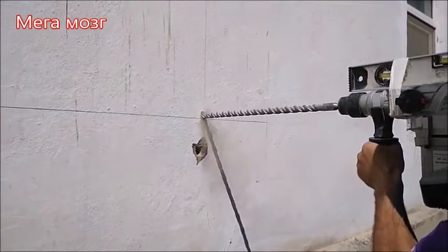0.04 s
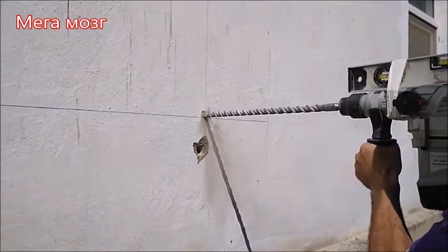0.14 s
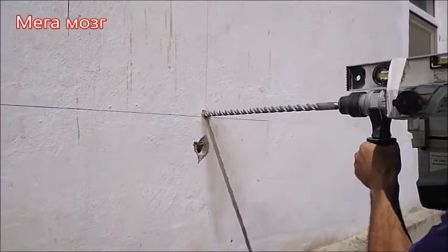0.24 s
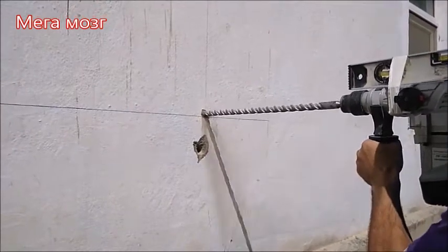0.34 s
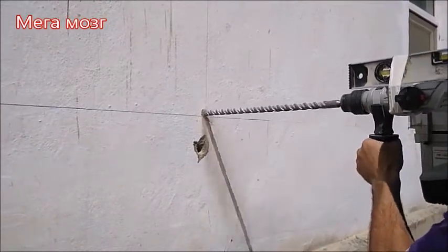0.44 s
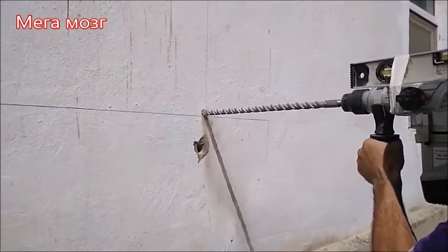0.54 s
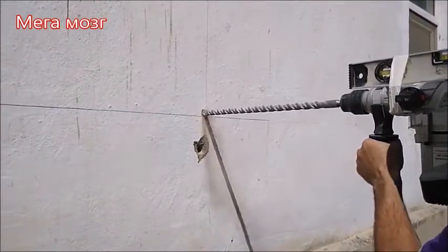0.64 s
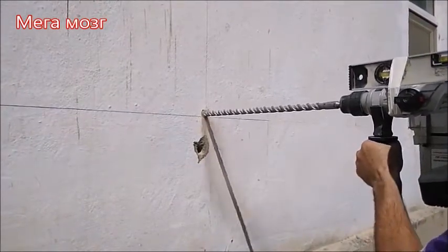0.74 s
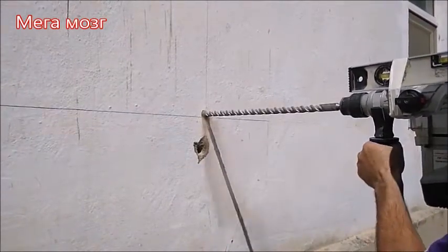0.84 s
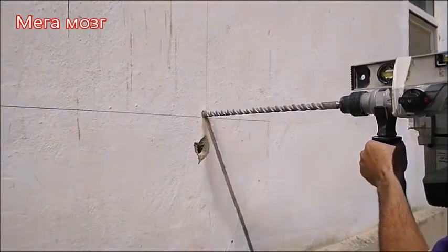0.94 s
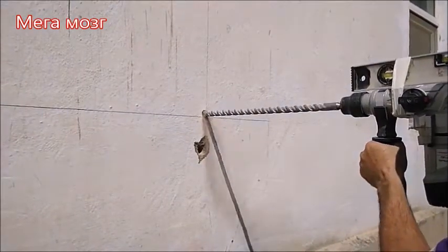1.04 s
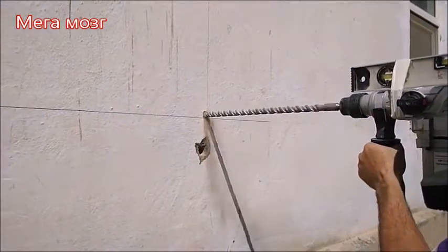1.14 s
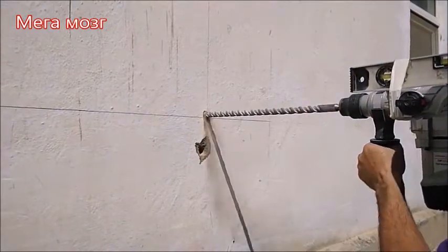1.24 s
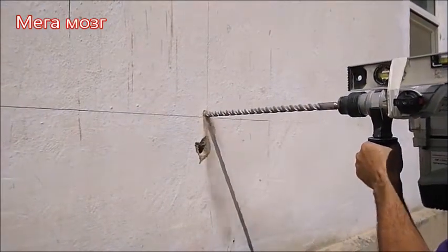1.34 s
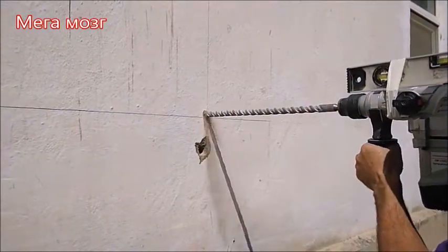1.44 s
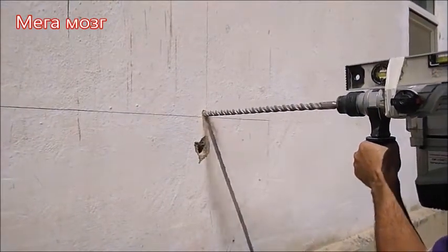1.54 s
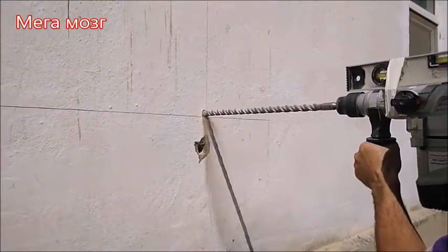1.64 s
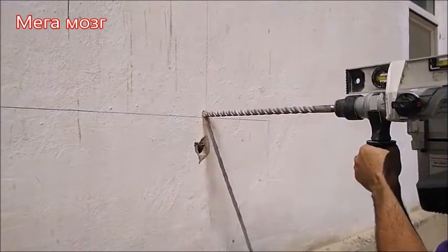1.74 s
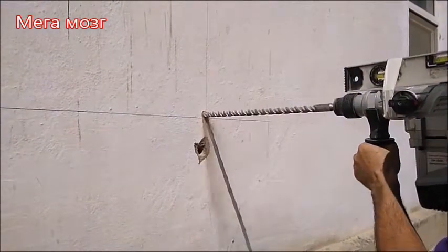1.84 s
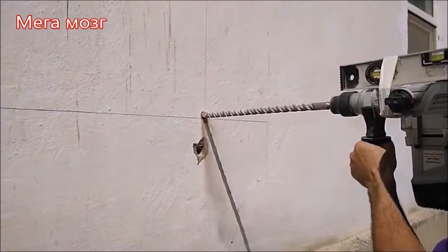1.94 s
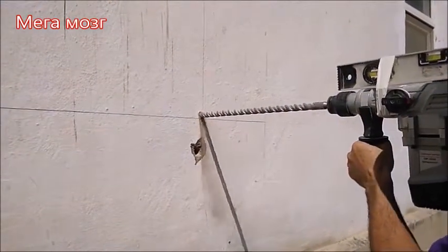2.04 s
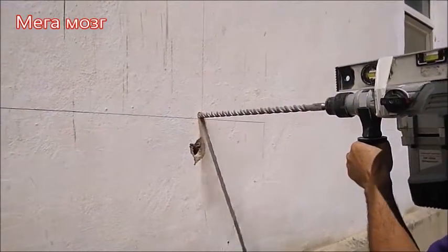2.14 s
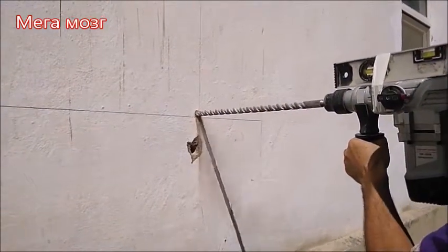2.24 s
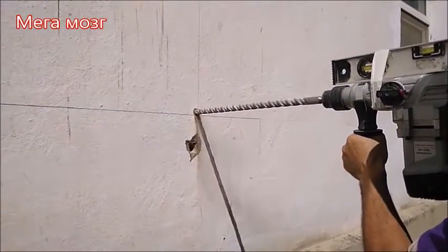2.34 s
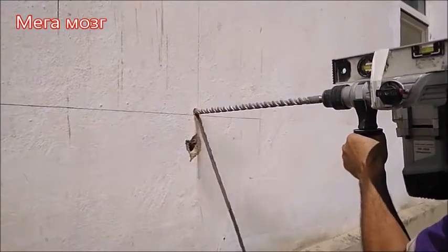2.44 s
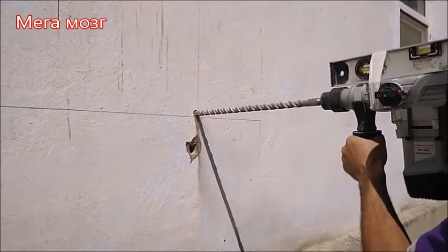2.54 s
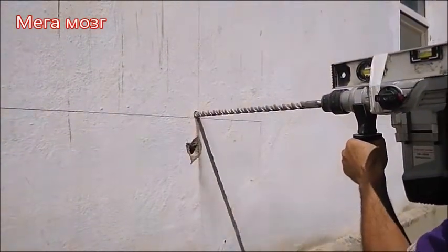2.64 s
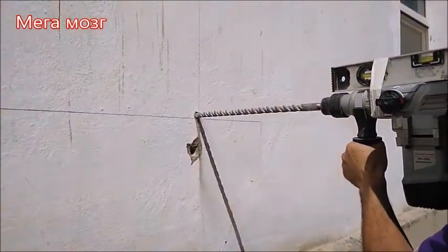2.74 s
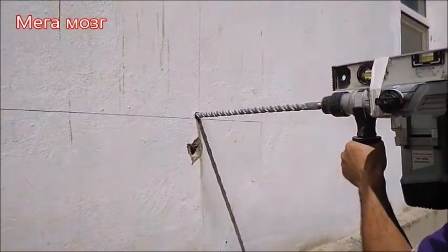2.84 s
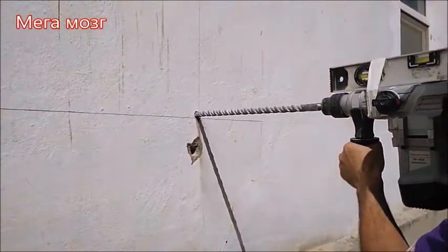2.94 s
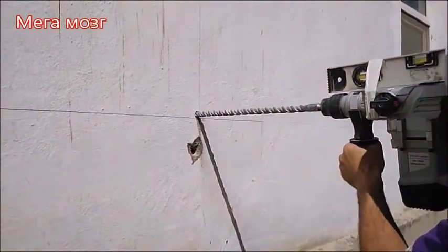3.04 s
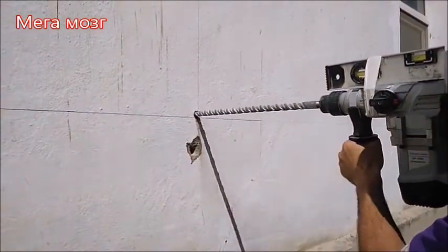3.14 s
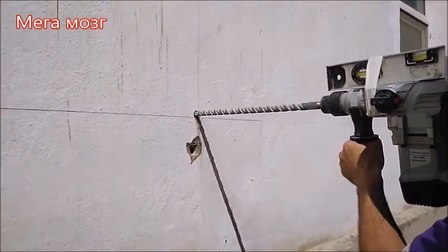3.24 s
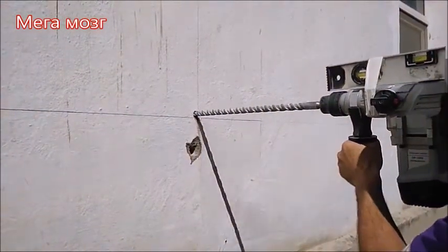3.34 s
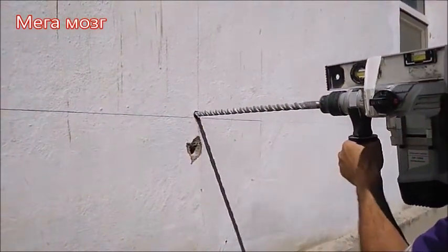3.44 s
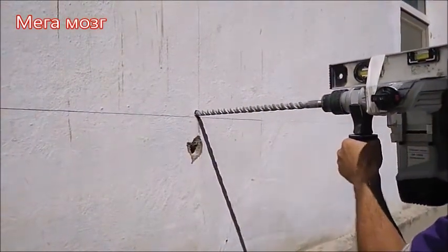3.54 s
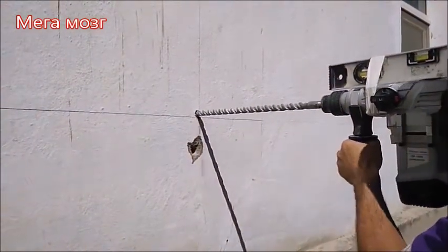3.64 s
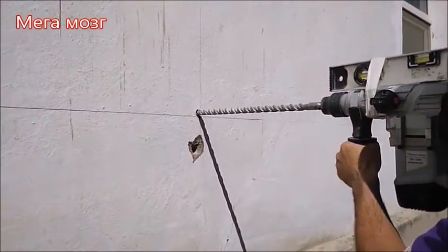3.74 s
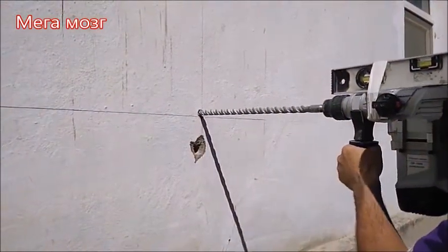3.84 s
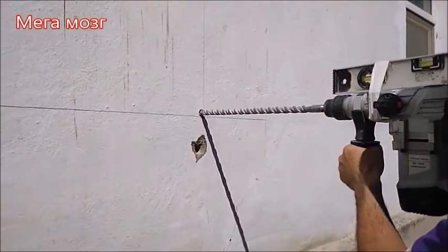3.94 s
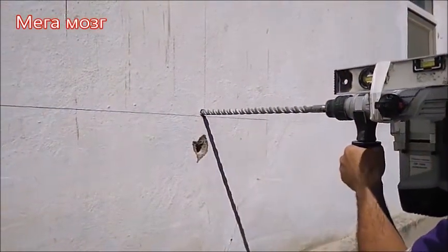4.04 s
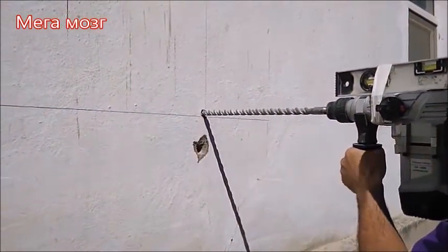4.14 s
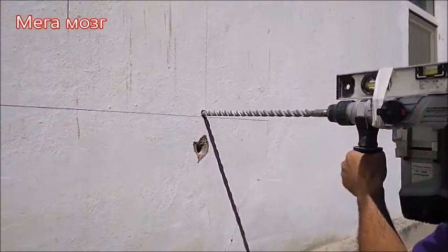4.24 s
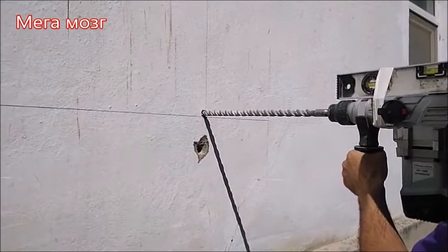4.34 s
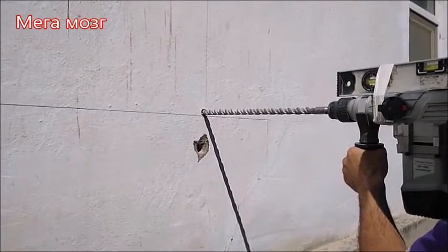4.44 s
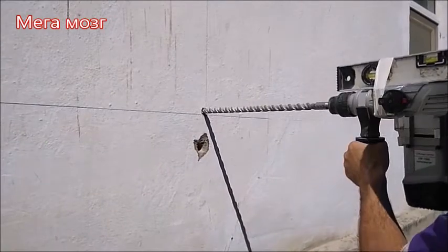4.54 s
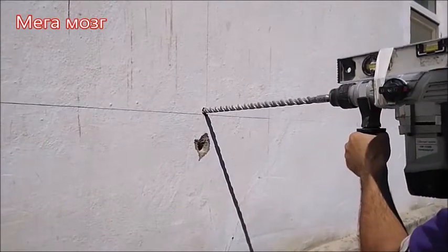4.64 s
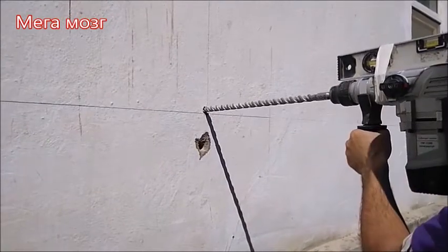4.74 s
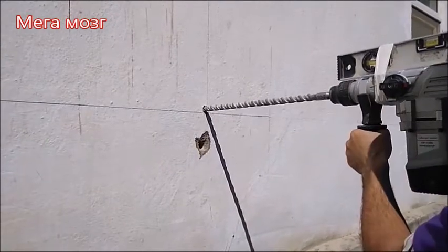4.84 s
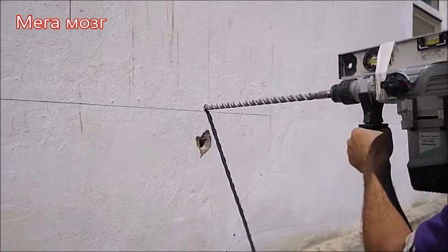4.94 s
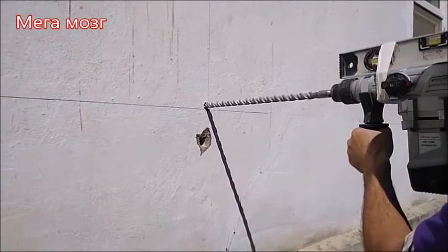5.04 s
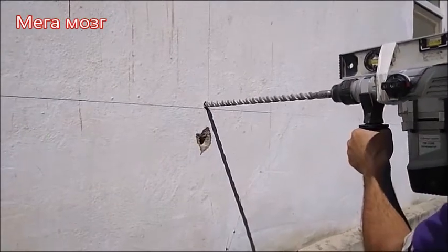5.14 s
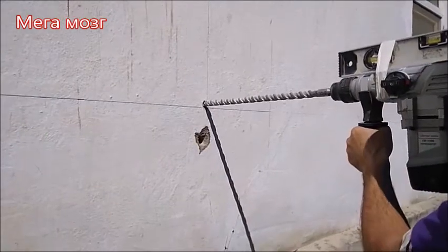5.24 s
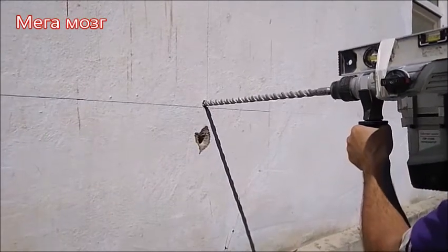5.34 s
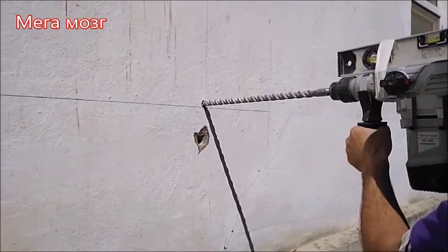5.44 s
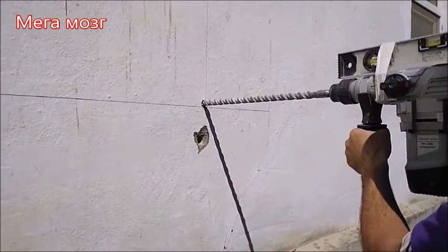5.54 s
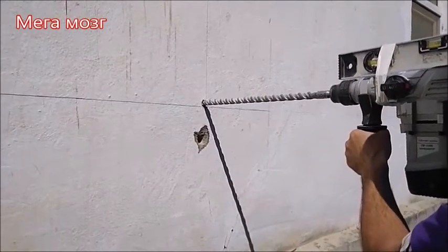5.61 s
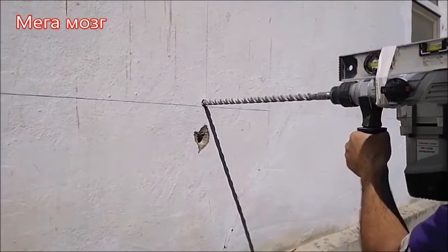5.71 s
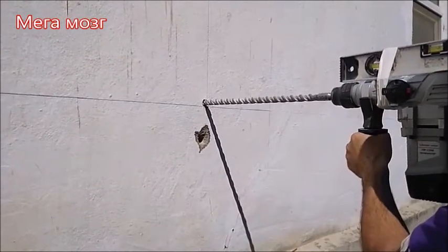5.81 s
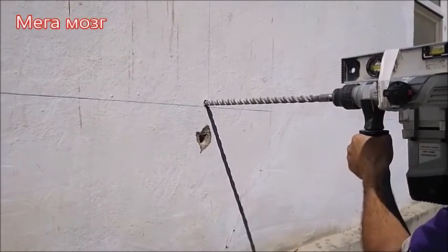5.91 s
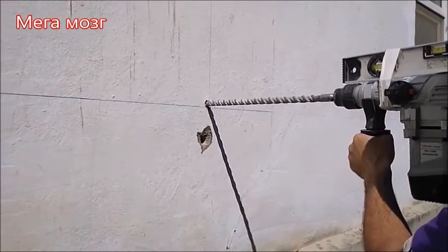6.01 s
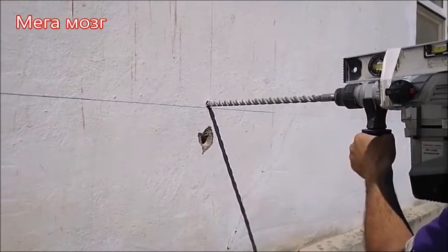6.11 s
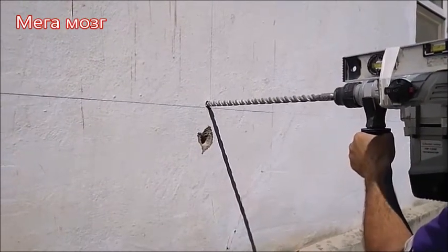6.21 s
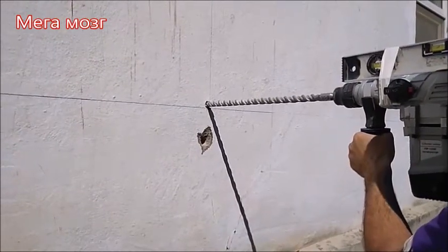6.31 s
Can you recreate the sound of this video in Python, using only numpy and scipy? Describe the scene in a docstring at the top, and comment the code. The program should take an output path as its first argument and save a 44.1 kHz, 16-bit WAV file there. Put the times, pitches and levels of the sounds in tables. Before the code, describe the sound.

From the start, a rotary hammer drills into a plastered wall outdoors, close to the microphone. Very fast blows merge into a loud, rattling buzz, with crunching grit and the high, wavering ring of the long steel bit. The tool groans briefly as the bit binds at about 2.3 and 2.9 seconds. Near 3 seconds the trigger is released: the blows slow and fade, and the bit knocks loosely in the hole until about 3.4 seconds. Fan and gears coast down, toward the right, with a whirr and a falling whine that dies by about 4.3 seconds, along with a few tiny gritty scrapes. The rest is much quieter. Low wind gusts touch the microphone from about 3.5 seconds, growing stronger from 5 seconds to the end near 6.4. A small bird twitters faintly from about 4.8 to 6.1 seconds over a soft outdoor rustle.

```python
"""A rotary hammer drills a plastered wall outdoors, close by: about 66 blows a second thump the housing,
ring the long steel bit and crush grit. The trigger is let go, the bit knocks loosely, and fan and gears
coast down with a falling whine. Then wind buffets the microphone and a small bird twitters over a
faint outdoor rustle."""
import sys
import numpy as np
from scipy import signal
from scipy.fft import rfft, irfft, next_fast_len
from scipy.io import wavfile
from scipy.ndimage import uniform_filter1d

SR = 44100
rng = np.random.default_rng(int(sys.argv[2]) if len(sys.argv) > 2 else 0)


def transcribe(u):
    """Save the signal u as a 16-bit wav file named by the first command-line argument.

    u: samples, shape (n,) or (channels, n), limited to [-1, 1]; the rate is SR.
    q: integer samples, one column per channel.
    """
    v = np.clip(np.atleast_2d(u).T, -1, 1)
    q = np.round(v * 32767).astype(np.int16)
    wavfile.write(sys.argv[1], SR, q)


N = 280917
T = np.arange(N) / SR
MID_ONLY = np.array([[1], [0]])  # pairs are mid and side until ears()
LET_GO_S = 2.957  # trigger released


def undb(db):
    """Decibels to gain."""
    return 10 ** (np.asarray(db) / 20)


def unit(x):
    """Scale to rms 1."""
    return x / np.sqrt(np.mean(x ** 2))


def curves(table):
    """A table's columns, interpolated over time."""
    s, *columns = np.transpose(table)
    return [np.interp(T, s, c) for c in columns]


def noise():
    """White noise for mid and side."""
    return rng.standard_normal((2, N))


def walk(rate_hz):
    """Smooth random drift of rms 1."""
    k = max(int(SR / rate_hz), 1)
    rough = uniform_filter1d(rng.standard_normal(N), k, mode="wrap")
    return unit(uniform_filter1d(rough, k // 2 + 1, mode="wrap"))


def colour(x, points):
    """Filter by a spectrum of (Hz, dB) points."""
    size = next_fast_len(N + SR // 10)
    hz, db = np.transpose(points)
    gain = undb(np.interp(np.log(np.arange(size // 2 + 1) * SR / size + 1), np.log(hz), db))
    return irfft(rfft(x, size) * gain, size)[..., :N]


def ring(x, modes, wander_db=0):
    """Sum of (Hz, width Hz, dB) resonances, each drifting in level as the contact point moves."""
    return sum(undb(db + (wander_db * walk(22) if wander_db else 0))
               * signal.lfilter(*signal.iirpeak(hz, hz / width, fs=SR), x) for hz, width, db in modes)


def fade(x, decay_s):
    """Give each impulse an exponential tail."""
    return signal.lfilter([1], [1, -np.exp(-1 / (decay_s * SR))], x)


def sweep(x, hz, width_hz):
    """One resonance with a moving centre."""
    turn = np.exp(2j * np.pi * np.cumsum(hz) / SR)
    return np.real(fade(x / turn, 1 / (np.pi * width_hz)) * turn)


def steady(x, window_s=0.17):
    """Hold a pair's slow mid level at 1, keeping fast flutter."""
    return x / np.sqrt(uniform_filter1d(x[0] ** 2, int(window_s * SR)) + 1e-12)


def swell(start_s, length_s):
    """One half-sine arch."""
    return np.sin(np.pi * np.clip((T - start_s) / length_s, 0, 1))


def bouts(table):
    """Arches from (start s, length s, height) rows."""
    return sum(height * swell(s, length) for s, length, height in table)


def bursts(table, power=1):
    """Gain arches from (start s, length s, dB) rows."""
    return sum(undb(db) * swell(s, length) ** power for s, length, db in table)


def ears(pair, pan_db=0):
    """Mid and side to left and right; positive pan leans left."""
    lean = undb(np.array([[1], [-1]]) * pan_db / 2)
    return np.array([pair[0] + pair[1], pair[0] - pair[1]]) * lean / lean.mean(axis=0)


def scatter(x, t60_s, wet_db):
    """Add a dense decaying tail of reflections."""
    t = T[:SR // 2]
    tail = rng.standard_normal(len(t)) * undb(-60 * t / t60_s)
    return x + undb(wet_db) * signal.fftconvolve(x, tail[None] / np.linalg.norm(tail), axes=1)[:, :N]


def crumble(x, flutter_db):
    """Make each band flutter independently."""
    edges_hz = [30, 1500, 3000, 4600, 6000, 7500, 9500, 12000, 20000]
    size = next_fast_len(N)
    spectrum = rfft(x, size)
    band = np.searchsorted(edges_hz, np.arange(size // 2 + 1) * SR / size)
    return sum(irfft(spectrum * (band == k), size)[:, :N] * undb(flutter_db * walk(44))
               for k in range(1, len(edges_hz)))


def rattle(per_s, spread_db):
    """Loose steel parts clack at random, a few of them hard."""
    at, size = rng.random((int(per_s * T[-1]), 2)).T
    return unit(np.bincount((at * (N - 1)).astype(int), undb(spread_db * size ** 2), N))


# Background spectrum. Each row: frequency in Hz, gain in dB.
AIR_SPECTRUM = [(35, -36.5), (64, -22.5), (126, -1.5), (193, -4), (850, -22), (1980, -34), (3700, -34),
                (8890, -36), (15800, -53)]

def air():
    """Faint outdoor rustle, widest in the treble."""
    rustle = unit(crumble(colour(noise(), AIR_SPECTRUM), flutter_db=2))
    mid, side = rustle * undb(-68.5 + 0.68 * walk(5))
    return ears([mid, colour(side, [(200, -12), (3000, -8.5), (7000, -1.5)])], pan_db=-7)


# Notes, near and far. Each row: start and length in seconds, start and end pitch in Hz, level in dB,
# rasp depth in Hz.
BIRD_NOTES = [(4.785, .06, 4250, 4150, -75, 40), (4.853, 0.047, 5530, 5220, -58.5, 261),
              (4.885, 0.034, 7080, 7740, -71, 199.5), (4.89, 0.044, 8500, 9260, -71, 200),
              (4.913, 0.048, 7300, 6600, -66, 150), (4.914, 0.047, 4700, 4540, -66, 69.8),
              (4.975, 0.087, 5840, 6500, -61, 454), (5.015, 0.062, 6470, 4840, -60, 220),
              (5.073, 0.034, 5400, 6050, -68, 407), (5.091, 0.042, 7960, 7050, -64, 330),
              (5.144, 0.076, 6260, 4150, -59, 332), (5.19, 0.091, 4290, 3930, -59.5, 222),
              (5.296, 0.043, 3960, 4050, -64, 129.6), (5.309, 0.021, 5200, 5900, -64, 400),
              (5.339, 0.048, 3780, 4360, -63, 160), (5.34, .035, 6100, 5770, -71, 260),
              (5.549, .08, 1177, 1060, -69, 35), (5.87, 0.11, 5030, 5110, -74, 110),
              (6.001, .04, 5110, 5030, -72.5, 90), (6.014, 0.13, 2940, 2880, -79, 60),
              (6.082, 0.046, 5120, 5160, -74, 98)]

def bird(trill_hz=70):
    """Short raspy glides from both sides of the syrinx, reflected by house fronts."""
    song = np.zeros(N)
    for s, length, start_hz, end_hz, db, rasp_hz in BIRD_NOTES:
        u = np.linspace(0, 1, int(length * SR))
        rasp = unit(uniform_filter1d(rng.standard_normal(SR // 2), size=90))[:len(u)]
        trill = np.sin(2 * np.pi * trill_hz * length * u)
        hz = start_hz + (end_hz - start_hz) * u + rasp_hz * (0.94 * rasp + trill)
        envelope = undb(db) * np.sin(np.pi * u) * (2 + trill) / 2.15
        song[int(s * SR):][:len(u)] += envelope * np.sin(2 * np.pi * np.cumsum(hz) / SR)
    return np.vstack([scatter(song[None] * unit(undb(2 * walk(150))), t60_s=0.18, wet_db=-2.5)
                      for ear in "LR"])


# Wind spectrum. Each row: frequency in Hz, gain in dB.
WIND_SPECTRUM = [(40, -37), (80, -31), (130, -1.5), (190, 4.5), (280, -4.5), (480, -18.5), (700, -35.5),
                 (1100, -39.5), (2000, -57), (9000, -85)]
# Gusts and single eddies. Each row: start in seconds, length in seconds, level in dB.
GUSTS = [(3.512, 0.12, -62), (3.79, 0.063, -71), (3.888, 0.21, -61), (4.532, .12, -63),
         (5.045, 0.198, -52.5), (5.538, 0.16, -49.5), (5.764, 0.46, -46.5), (6.29, 0.095, -48.5)]
EDDIES = [(3.972, 0.074, -46.5), (4.161, 0.055, -51), (4.693, 0.045, -51), (5.131, 0.019, -42),
          (5.218, 0.038, -35), (5.774, 0.034, -37), (5.842, 0.026, -45), (6.079, 0.042, -36),
          (6.342, 0.018, -37.5)]

def wind(attack_s=0.02, release_s=0.044, breeze_from_s=3.76):
    """A light breeze on the right, low fluttering gusts, and eddies that pop on the microphone."""
    gust_gain = sum(undb(db) * np.interp(T, [s - attack_s, s, s + length, s + length + release_s],
                                         [0, 1, 1, 0]) for s, length, db in GUSTS)
    breeze_gain = undb(-73) * np.clip((T - breeze_from_s) / attack_s, 0, 1)
    flutter = steady(colour(noise(), WIND_SPECTRUM), window_s=0.046) * undb(4.2 * walk(62))
    swirl = colour(colour(noise(), WIND_SPECTRUM), [(200, 3.5), (750, 7.5), (1200, -5)])
    eddies = steady(swirl, window_s=0.0123) * bursts(EDDIES, power=2)
    gusts = ears((flutter * gust_gain + eddies) * [[1], [0.02]])
    breeze = ears(flutter * breeze_gain * [[1], [0.3]], pan_db=-11)
    return signal.sosfilt(signal.butter(3, 105, "high", fs=SR, output="sos"), gusts + breeze)


# The tool shifting in the hole. Each row: start in seconds, length in seconds, level in dB.
SCRAPES = [(4.167, 0.036, -74), (4.205, 0.036, -68.5), (4.389, 0.033, -70.5)]

def scrapes():
    """The stopped bit grates in the dust."""
    return unit(colour(noise() * undb(3.2 * walk(515)), GRIT_SPECTRUM)) * bursts(SCRAPES)


# Fan and gear spectrum. Each row: frequency in Hz, gain in dB.
WHIRR_SPECTRUM = [(90, -36), (240, -9), (410, -7.5), (670, -10), (980, 3.5), (1500, -4), (2150, -6),
                  (3750, -4), (5300, -7.5), (5850, -14.5), (6800, -10), (11000, -13), (13000, -28.5),
                  (15800, -20.5)]

def whirr(rotor_hz, fall_from_s=3.294, fall_db_per_s2=202, stop_s=4.27):
    """The fan rushes and unloaded gears clatter in their play, dying to a faint whirr, then stopping."""
    rush = unit(scatter(colour(noise(), WHIRR_SPECTRUM), t60_s=0.044, wet_db=1.5))
    backlash = np.array([rattle(per_s=160, spread_db=16.5) for _ in range(2)])
    gears = unit(ring(colour(backlash, WHIRR_SPECTRUM), STEEL_MODES))
    running = np.interp(T, [LET_GO_S, LET_GO_S + 0.17, stop_s - 0.15, stop_s], [0, 1, 1, 0])
    gain = undb(-37 - fall_db_per_s2 * np.maximum(T - fall_from_s, 0) ** 2) + undb(-79)
    piston = 1 + 0.086 * np.sin(2 * np.pi * np.cumsum(rotor_hz) / SR / 22)  # one puff per 22 turns
    return (1.01 * rush + 0.4 * gears) * piston * running * gain * undb(2 * walk(50))


# Motor run-down. Each row: time in seconds, rotation in Hz, whine level in dB.
RUN_DOWN = [(3.3, 711, -68), (3.58, 660, -65), (3.605, 656, -55), (3.7, 624, -59), (3.8, 574, -59),
            (3.9, 522.3, -60), (4.0, 468, -65), (4.08, 420, -74), (4.3, 317, -98)]
# Motor case resonances. Each row: centre in Hz, width in Hz, gain in dB.
MOTOR_CASE_MODES = [(1150, 510, -6.5), (1588, 350, 3), (2520, 450, -1), (3740, 400, -13), (4810, 700, -10)]
# Rotor harmonics, from the second up. Each entry: level in dB.
HARMONICS_DB = [-2.5, -0.5, -1.5, -6, -1, -14, 0, -8]

def coasting():
    """Over the whirr, the slowing rotor's harmonics slide down through the resonances of its case."""
    hz, whine_db = curves(RUN_DOWN)
    fan_and_gears = whirr(hz)
    phase = 2 * np.pi * np.cumsum(hz * (1 + 0.007 * walk(280))) / SR
    whine = np.zeros(N)
    for k, harmonic_db in enumerate(HARMONICS_DB, 2):
        case = sum(undb(db) / (1 + (2 * (k * hz - f) / width) ** 4) for f, width, db in MOTOR_CASE_MODES)
        slowing = (hz / hz[0]) ** (1.3 * (k >= 4))  # upper harmonics die first
        flutter = unit(undb(4.2 * walk(45) + 2.5 * walk(260)))
        whine += case * slowing * flutter * np.sin(k * phase) * undb(harmonic_db)
    whine *= undb(whine_db) * np.interp(T, [3.2, 3.4, 4.2, 4.35], [0, 1, 1, 0])
    return fan_and_gears + scatter(whine * MID_ONLY, t60_s=0.085, wet_db=-4)  # wall reflections


# Jams. Each row: start in seconds, length in seconds, level in dB.
JAMS = [(2.31, 0.087, -43), (2.88, 0.076, -35), (2.995, 0.043, -47), (3.07, 0.071, -43.5)]
# Strained housing resonances. Each row: centre in Hz, width in Hz, gain in dB.
STRAIN_MODES = [(171.5, 21, -13.5), (238, 20, 8), (298, 27, -3), (363.6, 38, -8.5)]

def groans(hits):
    """The housing groans on the blows when the bit jams."""
    strain = ring(hits * MID_ONLY, STRAIN_MODES)
    strain = colour(strain, [(80, -22.5), (160, -4.5), (400, 3.5), (900, -15)])
    return steady(strain, window_s=0.04) * bursts(JAMS)


# Notes of the bit. Each row: start in seconds, length in seconds, pitch in Hz, level in dB.
BIT_NOTES = [(.19, .31, 985, -29.5), (.55, .23, 985, -30), (.13, .24, 935, -35), (.6, .12, 930, -34),
             (.16, .15, 5398, -29), (.33, .1, 5395, -28), (.5, .13, 5405, -29), (.68, .13, 5400, -27.5),
             (1.1, .13, 5400, -31), (1.22, .1, 5295, -30), (1.345, .1, 5265, -26), (3.195, .035, 5530, -32)]

def singing(rebound):
    """The freely turning bit sings nearly pure notes that throb with the blows."""
    drift_hz = 6 * walk(40)
    throb = unit((1 + 0.5 * rebound) * undb(2 * walk(65)))
    notes = sum(undb(db) * np.sqrt(2 * swell(s, length))
                * np.exp(2j * np.pi * np.cumsum(hz + drift_hz) / SR) for s, length, hz, db in BIT_NOTES)
    return throb * np.array([notes.real, notes.imag])


# Lengthwise resonances of the bit. Each row: centre in Hz, width in Hz, gain in dB.
FIRST_MODES = [(5060, 21, 1.5), (5170, 60, -6.5), (5287, 36, 0), (5400, 62, 1)]
SECOND_MODES = [(10490, 40, -13), (10615, 45, -13), (10705, 16, 3), (10805, 80, -9.5), (10950, 40, -16)]
# Second ring's envelope. Each row: time in seconds, level in dB.
SECOND_LEVEL = [(0.0, -18.5), (0.11, -22), (0.76, -25.5), (0.79, -20), (0.9, -34.5), (0.93, -22),
                (1.26, -31), (2.16, -23.5), (2.2, -30), (2.76, -24.5), (2.79, -33), (2.87, -26),
                (2.89, -38), (2.97, -28.5)]

def lengthwise_rings(impacts, rebound, build_s=0.46, choke_s=1.43):
    """Blows ring the bit lengthwise; the hole's side damps it, and its grip chokes the first ring."""
    first = ring(impacts(blow=0.47, grind=0.56), FIRST_MODES, wander_db=3.5)
    first = colour(first, [(2500, -28.5), (5000, -1.5), (5500, -6.5), (5800, -13.5)])
    second = ring(impacts(blow=0.5, grind=0.1), SECOND_MODES)
    second = colour(second, [(10100, -14), (10480, 1), (10950, 1.5), (11600, -13)]) * (1 + 0.5 * rebound)
    first_db = np.interp(T, [0, build_s, choke_s, choke_s + 0.0343], [-32, -30.5, -30.5, -37])
    first_db += 2 * walk(30) + 1.3 * walk(240)
    second_db = curves(SECOND_LEVEL)[0] + 1.8 * walk(90)
    return (steady(first, window_s=0.06) * undb(first_db)
            + steady(second, window_s=0.081) * undb(second_db))


# Free bending resonances. Each row: centre in Hz, width in Hz, gain in dB.
BEND_MODES = [(960, 32, 0), (976.6, 19, 12)]
# Loaded bending note. Each row: time in seconds, pitch in Hz.
BEND_PITCH = [(.9, 1130), (1.15, 1057), (1.19, 999), (1.24, 1130), (1.29, 1010), (1.45, 1010), (1.56, 950),
              (1.64, 995), (1.7, 935), (1.79, 1130), (1.92, 1080), (2.01, 964), (2.13, 1150), (2.28, 1130),
              (2.35, 940), (2.42, 1070), (2.54, 920), (2.62, 920), (2.73, 1170), (2.8, 1145), (2.88, 950),
              (2.94, 1030), (2.98, 974), (3.09, 980), (3.17, 894), (3.3, 1170)]
# Push on the bit. Each row: time in seconds, load from 0 to 1.
LOAD = [(0, 0.68), (.3, 0.03), (.8, 0.25), (1.15, 0.88), (1.45, 0.6), (1.75, 0.88)]

def bending(impacts):
    """The bit bends; under load its note wanders and chatters as its contact with the hole shifts."""
    load = curves(LOAD)[0]
    flexing = impacts(blow=0.41, grind=0.4)
    note = unit(sweep(flexing, curves(BEND_PITCH)[0] + 18 * walk(130), width_hz=55))
    chatter = unit(ring(impacts(blow=0.38, grind=0.3), [(1130, 380, 0)]))
    loaded = unit(note + undb(-3.5) * chatter)
    free = unit(ring(flexing, BEND_MODES, wander_db=2))
    bend = (1 - load) * free + load * loaded
    return colour(bend, [(200, -28), (850, 5.5), (1250, 4), (1500, -8.5), (3000, -24)])


# Housing resonances. Each row: centre in Hz, width in Hz, gain in dB.
HOUSING_MODES = [(185.7, 45, -5), (262.5, 44, 7), (330, 33, 10.5), (455, 24, -0.5), (534, 26, 3.5),
                 (596.5, 19, -3), (658.6, 20, -5)]

def housing_thump(impacts):
    """Blows buzz the housing, cleanly at first, more raggedly as the hole deepens."""
    clean = np.interp(T, [1.75, 2.1], [1.2, 0.7])
    thump = ring(impacts(blow=clean, grind=0.8), HOUSING_MODES)
    return colour(thump, [(50, -14.5), (100, -15), (160, 2), (650, -2.5), (1300, -21.5), (4000, -37)])


# Clack spectrum. Each row: frequency in Hz, gain in dB.
CLACK_SPECTRUM = [(300, -21), (680, -0.5), (1200, -1), (1420, -12.5), (1750, -5), (2200, -8.5),
                  (4000, -4.5), (11000, -12.5)]

def striker_clack(hits, bounce_s=0.00505):
    """The striker lands hard in the gear case and bounces once."""
    landings = (hits + 0.56 * np.roll(hits, int(bounce_s * SR))) * undb(1.5 * walk(59))
    strikes = np.vstack([scatter(landings[None], t60_s=0.026, wet_db=14) for _ in range(2)])
    return steady(colour(strikes, CLACK_SPECTRUM))


# Chuck and gear case resonances. Each row: centre in Hz, width in Hz, gain in dB.
STEEL_MODES = [(1645, 90, -2), (1862, 45, -1), (2280, 50, -5), (2600, 80, -6), (2890, 40, -1.5),
               (3140, 70, -2.5), (3375, 50, -2.5), (3610, 60, 3), (3817, 45, 2), (3980, 50, -3),
               (4210, 55, -2), (4406, 45, -3.5), (4520, 50, -1.5), (4635, 45, -3.5), (6142, 55, 1),
               (6375, 55, 1), (6612, 55, 3), (7445, 60, -.5), (8037, 60, .5), (8748, 45, 1.5),
               (10024, 50, 4)]

def steel_ring(impacts):
    """Impacts and loose parts ring the chuck and gear case."""
    drive = impacts(blow=0.12, grind=1.2)
    loose = np.array([rattle(per_s=420, spread_db=8) for _ in range(2)])
    return unit(ring(drive + 0.76 * loose, STEEL_MODES, wander_db=4.5))


def chips(per_s, spread_db):
    """Stone grains crack under the tip: brief pings of random pitch and size."""
    out = np.zeros(N)
    for at, pitch, size, length in rng.random((int(per_s * T[-1]), 4)):
        u = np.linspace(0, 1, int(SR * (0.0018 + 0.0081 * length)))
        ping = np.sqrt(u) * (1 - u) ** 2 * np.sin(2 * np.pi * (2400 + 7200 * pitch) * T[:len(u)])
        start = int(at * (N - len(u)))
        out[start:start + len(u)] += ping * undb(spread_db * size ** 2)
    return unit(out)


# Crushing spectrum. Each row: frequency in Hz, gain in dB.
GRIT_SPECTRUM = [(150, -36.5), (400, -3), (750, -8.5), (1150, -4), (1420, -15), (1750, -11), (2200, -15.5),
                 (3700, -4), (4700, -0.5), (5350, -1.5), (5880, -7), (6300, 0), (8600, 2.5), (9300, -2),
                 (10100, 2.5), (11400, -5.5), (12200, 2), (13200, -9.5), (14300, -5), (15100, -7),
                 (15800, -9.5)]

def crushing(impacts):
    """The tip crushes grit; the bands flutter as chips of changing size break off."""
    grinding = colour(impacts(blow=0, grind=2.2), GRIT_SPECTRUM)
    return unit(crumble(scatter(grinding, t60_s=0.046, wet_db=4), flutter_db=3))


# Hammer rate. Each row: time in seconds, blows per second.
BLOW_RATE = [(0, 66.7), (.3, 65.9), (1.85, 65.7), (2.0, 66.8), (2.28, 66.6), (2.32, 72.5), (2.39, 66.6),
             (2.46, 68.4), (2.53, 66.2), (2.87, 66.1), (2.91, 61), (2.96, 56), (3.01, 60.5), (3.12, 55.5),
             (3.34, 51)]

def blows(jitter_s=0.00013):
    """One impulse per piston stroke; the rate races as the bit slips, sags on binding or release."""
    hz = curves(BLOW_RATE)[0] * (1 + 0.0023 * walk(3))
    turns = np.cumsum(hz) / SR
    strokes = np.arange(int(turns[-1]))
    at_s = np.interp(strokes, turns, T) + jitter_s * rng.standard_normal(len(strokes))
    return np.bincount(np.clip(at_s * SR, 0, N - 1).astype(int), minlength=N).astype(float)


# Bite of the bit. Each row: time in seconds, level in dB.
BITE = [(0.0, -26.5), (0.07, -27), (0.15, -27.5), (0.28, -23), (0.3, -25.5), (0.42, -24), (0.98, -25.5),
        (1.03, -28.5), (1.17, -26), (1.27, -27.5), (1.69, -24.5), (1.73, -28), (2.97, -25.5)]
# Catches on hard stone (+) and slips (-). Each row: start and length in seconds, thump change in dB.
CATCHES = [(0, 0.046, 6), (.83, 0.069, -6), (.9, 0.031, 3), (1.14, 0.079, 3.5), (1.255, 0.064, -8),
           (1.84, 0.18, -3.5)]
# Whipping of the bit. Each row: start and length in seconds, bending rise in dB.
WHIPS = [(1.38, 0.16, 1.9), (1.97, 0.1, 6), (2.69, .16, 2.9), (2.91, 0.12, 9.6)]
# Loose knocks of the bit in its hole. Each row: start in seconds, level in dB.
KNOCKS = [(3.038, -26), (3.069, -29.5), (3.087, -30), (3.115, -34.5), (3.144, -22.5), (3.172, -26.5),
          (3.205, -26), (3.244, -32), (3.286, -33), (3.395, -40)]

def hammer(easing_db_per_s=47.5, last_blow_s=3.34, stopping_s=0.066):
    """Blows and rebounds drive housing, steel and grit; on release they ease off and the bit knocks."""
    hits = blows()
    rebound = unit(fade(fade(hits, decay_s=0.0042), decay_s=0.0069))  # swells and dies after each blow

    def impacts(blow, grind):
        """The blow, the small impacts after it and the steady grinding of the turning bit."""
        return unit(noise() * (rebound + grind) * undb(1.1 * walk(780))) + blow * unit(hits) * MID_ONLY

    bite_db, catch_db = curves(BITE)[0], bouts(CATCHES)
    tip_db = bite_db + 0.45 * catch_db
    crunch, steel = crushing(impacts), steel_ring(impacts)
    cracks = np.array([chips(per_s=490, spread_db=10.5) for _ in range(2)])
    grit = steady(undb(3) * crunch + undb(0.43) * steel + undb(-8.5) * cracks)
    grit *= undb(tip_db + 3 + 0.35 * walk(30))
    thump, bend = housing_thump(impacts), bending(impacts)
    body = steady(thump) * undb(bite_db - 13 + catch_db + 1.4 * walk(23))
    body += steady(bend) * undb(-34.5 + bouts(WHIPS) + 3.2 * walk(27))
    rings = lengthwise_rings(impacts, rebound)
    clack = striker_clack(hits) * undb(tip_db - 7)
    working = np.clip((last_blow_s - T) / stopping_s, 0, 1)
    working *= undb(-easing_db_per_s * np.maximum(T - LET_GO_S, 0))
    knock_gain = sum(undb(db) * swell(s, length_s=0.018) for s, db in KNOCKS)
    knocks = knock_gain * unit(crunch + 0.41 * steel + 0.5 * unit(bend) + 0.25 * unit(thump))
    return working * (grit + clack + rings + body) + knocks + groans(hits) + singing(rebound)


# Drill width. Each row: frequency in Hz, side gain in dB.
DRILL_WIDTH = [(100, -9.5), (300, -7.5), (1000, -10.5), (2800, -18), (5400, -20.5), (6500, -2), (10700, -4),
               (13000, -1.5)]
# Left-right balance of the drill sound: the left side falls away as the drill stops.
# Each row: time in seconds, left minus right in dB.
DRILL_BALANCE = [(0, -0.5), (1.5, -1.1), (2.85, -2.5), (3.2, -9), (3.4, -13.5), (3.8, -10), (4.05, -9),
                 (4.4, -4)]

def scene():
    """The drill at the wall, then wind and bird, over quiet air."""
    mid, side = colour(hammer() + coasting() + scrapes(), [(30, -9.5), (90, -1), (15000, 1)])
    drill = ears([mid, colour(side, DRILL_WIDTH)], curves(DRILL_BALANCE)[0])
    return drill + wind() + bird() + air()


def record(dry):
    """Round the rare tall peaks and cut the top."""
    ceiling, top_hz = 0.85, 15800
    lowpass = signal.ellip(12, 0.1, 80, top_hz, fs=SR, output="sos")
    return signal.sosfilt(lowpass, ceiling * np.tanh(dry / ceiling))


dry = scene()
out = record(dry)
transcribe(out)
```